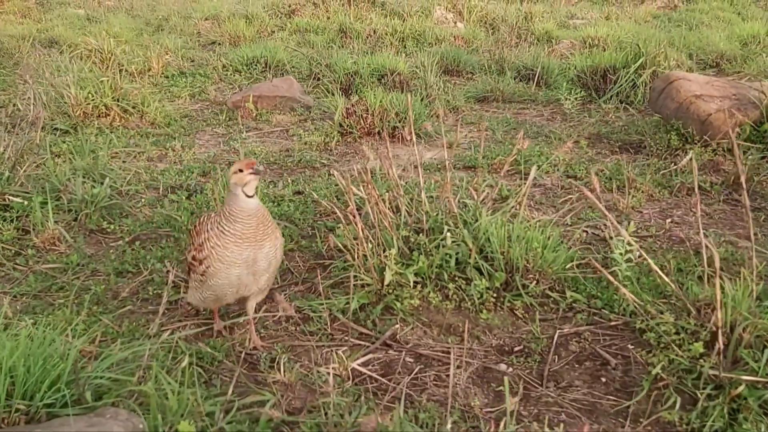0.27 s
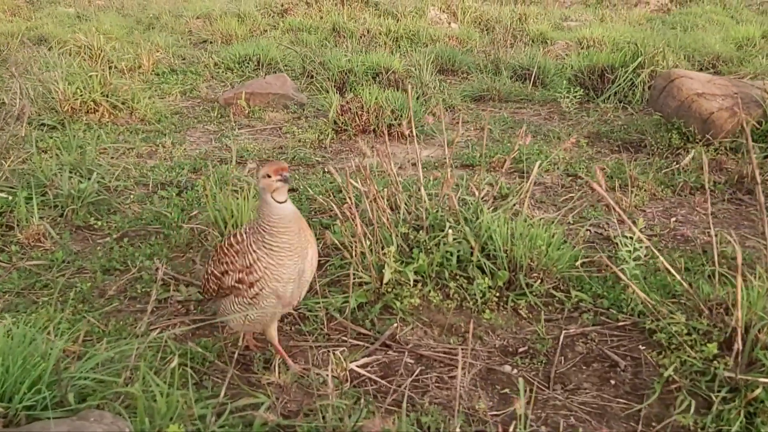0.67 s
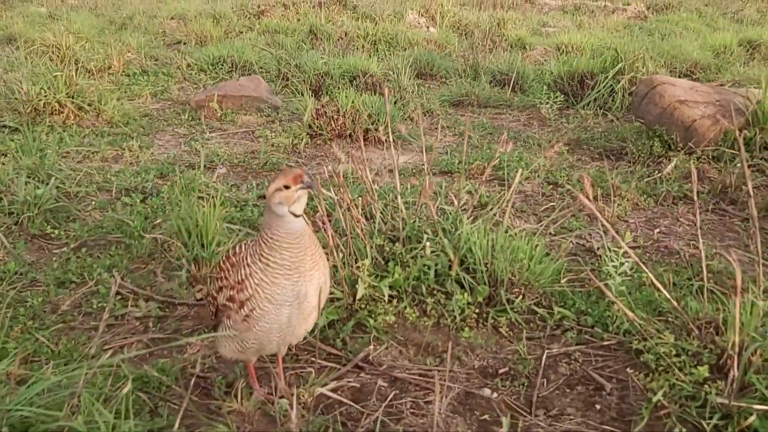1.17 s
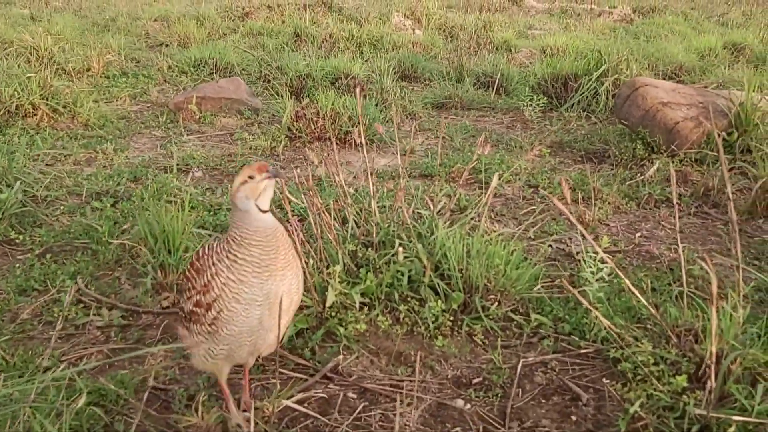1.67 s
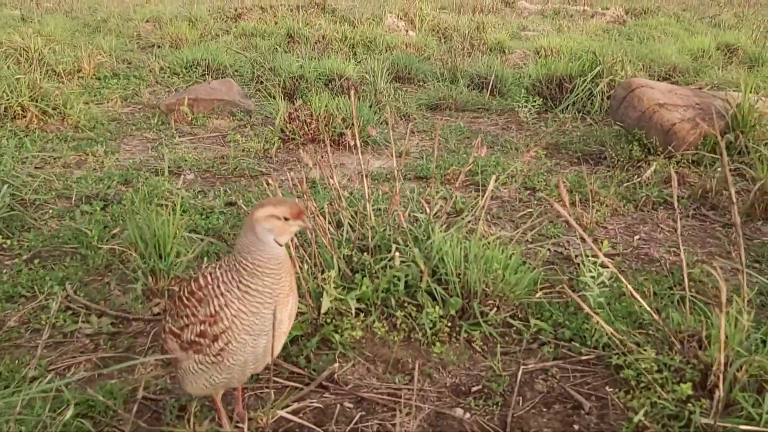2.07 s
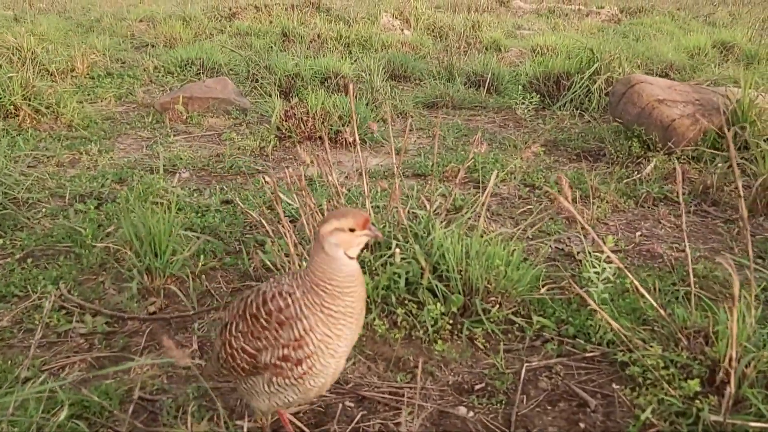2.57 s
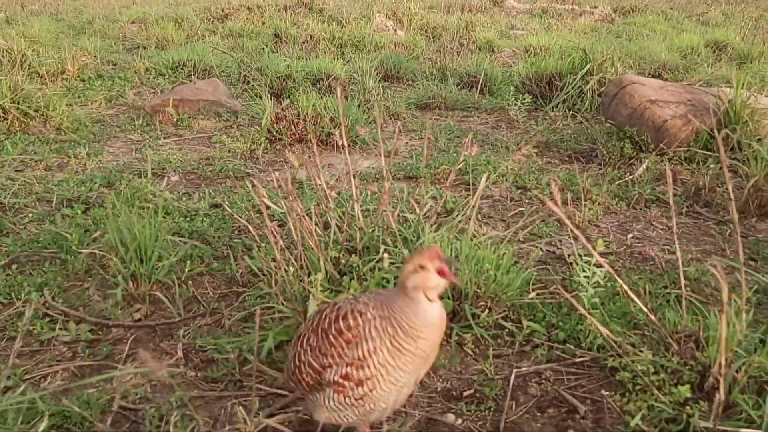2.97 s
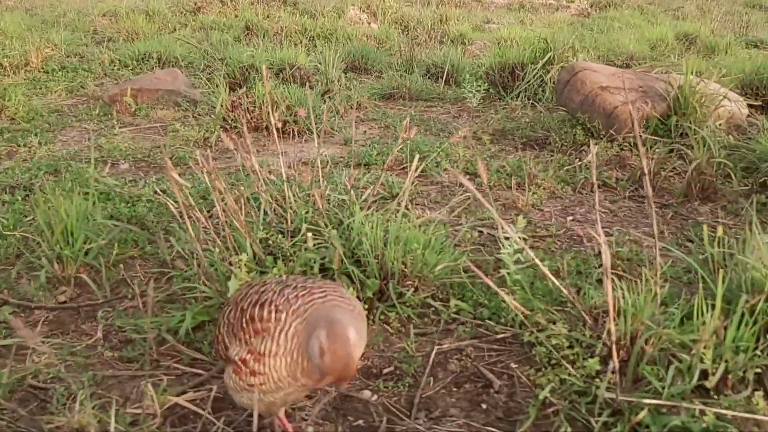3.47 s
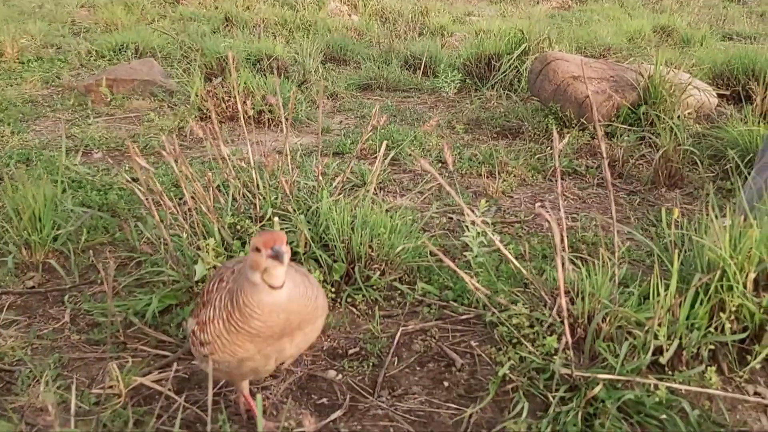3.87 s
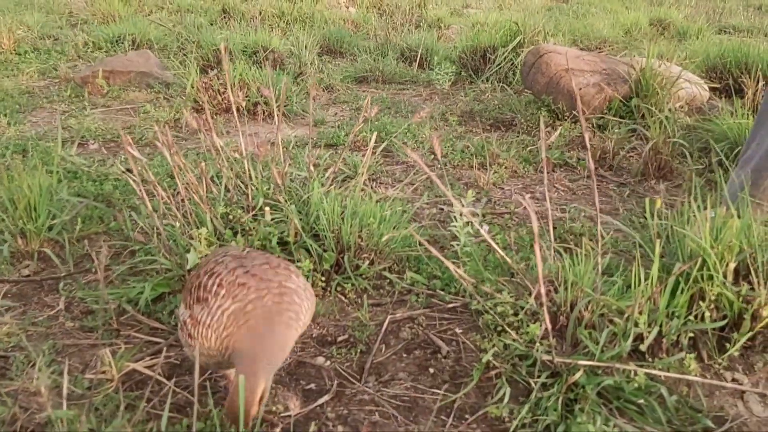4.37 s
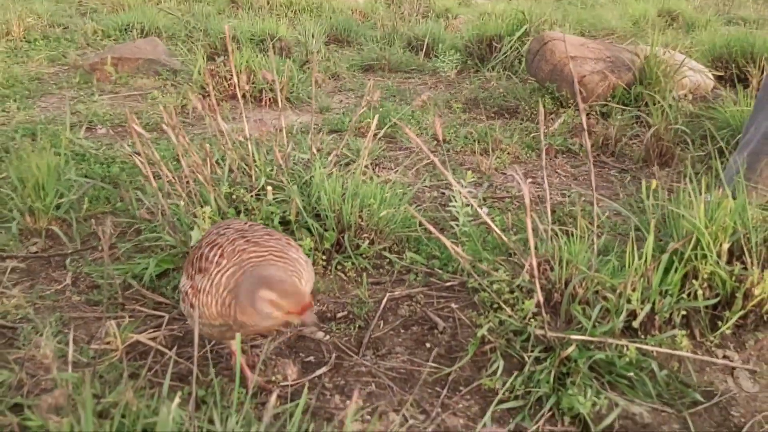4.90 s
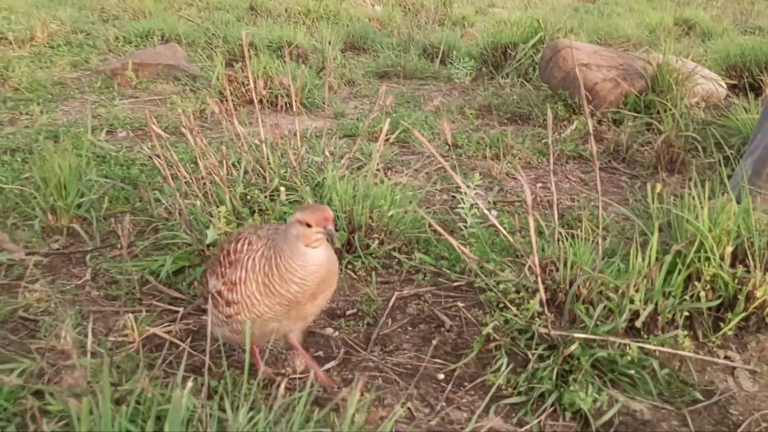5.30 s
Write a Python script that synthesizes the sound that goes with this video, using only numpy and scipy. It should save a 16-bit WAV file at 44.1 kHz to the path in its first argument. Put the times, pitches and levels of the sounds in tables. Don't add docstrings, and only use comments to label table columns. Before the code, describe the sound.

Two game birds duet loudly up close in open grassland: pure high whistles answered by raspy double notes and fading hoarse clucks over faint wind rumble.

```python
import sys
import numpy as np
from scipy import signal
from scipy.fft import rfft, irfft, next_fast_len
from scipy.io import wavfile
from scipy.ndimage import map_coordinates

SR = 44100
rng = np.random.default_rng(int(sys.argv[2]) if len(sys.argv) > 2 else 0)


def dump_mix(stems):
    frames = np.atleast_2d(stems).T
    limited = np.clip(frames, -1, 1)
    pcm = np.round(limited * 32767).astype(np.int16)
    wavfile.write(sys.argv[1], SR, pcm)


def gain_from_db(level_db):
    decades = np.asarray(level_db, float) / 20
    return 10 ** decades


N = 244302


def rms_one(x):
    return x / np.sqrt(np.mean(x ** 2) + 1e-20)


def colour(x, points):
    size = next_fast_len(N + 4096)
    hz, db = np.transpose(points)
    log_hz = np.log(np.arange(size // 2 + 1) * SR / size + 1)
    gain = gain_from_db(np.interp(log_hz, np.log(hz), db, left=db[0] - 23.5))
    return irfft(rfft(x, size) * gain, size)[..., :N]


def port_noise(shared):
    return rng.standard_normal((2, N)) + shared * rng.standard_normal(N)


def drift(rate_hz):
    lowpass = signal.butter(2, rate_hz, fs=SR, output="sos")
    return rms_one(signal.sosfilt(lowpass, rng.standard_normal(N + SR))[SR:])


def turns(hz):
    return 2 * np.pi * np.cumsum(hz) / SR


def clock(start, early, late):
    at = np.arange(round((start + early) * SR), min(round((start + late) * SR), N))
    return at, at / SR - start


def gate(t, on, off, attack, release):
    return -30 * np.maximum(np.maximum((on - t) / attack, (t - off) / release), 0)


def hill(t, top, rise, fall):
    return -np.maximum((top - t) * rise, (t - top) * fall)


PATCH_EDGES_HZ = [500, 1500, 2300, 3200, 4500, 6300, 9000, 16000]


def patchy(points, patch_db, rate_hz):
    noise = rms_one(colour(rng.standard_normal(N), points))
    total = np.zeros(N)
    for edges in zip(PATCH_EDGES_HZ, PATCH_EDGES_HZ[1:]):
        band = signal.butter(2, edges, "band", fs=SR, output="sos")
        total += signal.sosfilt(band, noise) * gain_from_db(patch_db * np.minimum(drift(rate_hz), .8))
    return rms_one(total)


# [pitch_hz, level_db]
AIR = [(500, 0), (2000, -2), (5000, -12), (8000, -24), (11000, -22), (15500, -15)]


def air():
    return gain_from_db(-75) * rms_one(colour(port_noise(0), AIR))


# [pitch_hz, level_db per Hz]
RUMBLE = [(15, -40), (30, -12.5), (65, 4), (100, 4.5), (135, -0.65), (176, -10.5), (227, -27.5),
          (299, -13.5), (344, -26), (400, -36.5), (520, -68.5), (880, -120)]
# [time_s, level_db]
BREEZE = [(0, -60.5), (.2, -61.5), (.28, -50.5), (.7, -52.5), (.95, -66), (2.2, -59.5), (2.6, -66.5),
          (3.6, -62.5), (4.05, -66), (5.54, -59.5)]
# [peak_s, level_db, width_s to a 12 dB drop, sign ignored]
GUSTS = [(0.508, -56.5, -0.36), (.63, -43, 0.02), (1.129, -55.5, 0.36), (1.292, -73, -0.55),
         (1.8, -64.5, 0.1), (4.171, -63.5, 0.52), (5.52, -58, -0.1)]


def wind():
    time = np.arange(N) / SR
    thumps = [(s + SECOND_S / 2, puff_db - 7, .035) for (s, *_), (*_, puff_db) in zip(ANSWERS, ANSWER_COLOUR)]
    push = gain_from_db(np.interp(time, *np.transpose(BREEZE)))
    for s, db, width in list(GUSTS) + thumps:
        push += gain_from_db(db - 12 * ((time - s) / width) ** 2)
    white = port_noise(.5)
    lumps = gain_from_db(3.5 * np.array([drift(5.4), drift(11)]))
    rumble = rms_one(colour(white, RUMBLE)) * push * lumps
    flutter = rms_one(colour(white, [(120, -8), (200, 0), (330, -6), (480, -15), (700, -40)]))
    return rumble * gain_from_db([[1.2], [-1.2]]) + flutter * gain_from_db(-69 + 3 * drift(14))


def fly():
    out, length = np.zeros((2, N)), .14
    at, t = clock(1.895, -.03, length + .03)
    hz = 262 * (1 + 0.036 * np.sin(np.pi * t / length))
    out[:, at] += gain_from_db(-57 + gate(t, 0, length, 0.033, 0.025)) * np.sin(turns(hz))
    return out


# [start_s, level_db, pitch_hz]
RUSTLES = [
    (5.156, -45.5, 1300),
    (5.191, -45.5, 1697),
    (5.212, -36, 900),
    (5.225, -33.5, 595),
    (5.286, -47.5, 1490),
]


def grass():
    out = np.zeros((2, N))
    fade = np.exp(-np.arange(600) / (0.0054 * SR))
    for s, db, hz in RUSTLES:
        band = signal.butter(1, [hz * 0.71, hz * 0.9], "band", fs=SR, output="sos")
        tick = signal.sosfilt(band, rng.standard_normal((2, 600)))
        out[:, round(s * SR):round(s * SR) + 600] += gain_from_db(db) * tick * fade
    return out


def breath_puffs():
    out = np.zeros((2, N))
    noise = port_noise(.5) + 2.5 * rng.standard_normal(N)
    blast = rms_one(colour(noise, [(40, -18), (90, 0), (200, -6), (450, -5.5), (800, -17.5)]))
    for (s, *_), (*_, puff_db) in zip(ANSWERS, ANSWER_COLOUR):
        at, t = clock(s, -.01, .11)
        puffs = sum(gain_from_db(hill(t, flip, 3000, 1395) + 8) for flip in (.003, FIRST_END_S, SECOND_S))
        breath = gain_from_db(-8.5 + gate(t, 0, .07, .01, 0.23))
        out[:, at] += gain_from_db(puff_db) * (puffs + breath) * blast[:, at]
    return out


# [left_s, right_s, level_db]
ECHOES = [
    (.011, .013, -26),
    (.022, .019, -33),
    (.034, .038, -44),
    (.050, .056, -55),
    (.078, .076, -45),
    (.098, .105, -58),
]
# [pitch_hz, level_db]
GROUND = [(300, -3), (2250, 2), (2650, -9), (3600, -6), (8000, -17), (16000, -40)]


def echoes(thrown):
    out, dull = np.zeros((2, N)), colour(thrown.mean(axis=0), GROUND)
    for *lags, db in ECHOES:
        for side, lag in enumerate(lags):
            smear = rms_one(rng.standard_normal(440) * np.hanning(440)) / np.sqrt(440)
            start = round(lag * SR)
            out[side, start:] += gain_from_db(db) * signal.oaconvolve(dull, smear)[:N - start]
    return out


# [time_s, right-port delay_samples]
BEARING = [(0, 6.75), (2.102, 6.4), (2.301, 5.1), (2.8, 6), (3.001, 0.99), (3.202, 2.3), (3.297, 4.6),
           (3.8, 7.8), (4.3, 5.2)]
# [pitch_hz, left-right level_db]
HEAD_SHADOW = [(20, -1.5), (500, 0.5), (1200, -6), (1800, -5.5), (2600, -7), (4000, -7), (6500, 2),
               (8000, -8), (12000, -8.5)]


def two_ports(x):
    lag = np.interp(np.arange(N) / SR, *np.transpose(BEARING))
    late = map_coordinates(x, [np.arange(N) - lag], order=3)
    left = colour(x, [(hz, db / 2) for hz, db in HEAD_SHADOW])
    right = colour(late, [(hz, -db / 2) for hz, db in HEAD_SHADOW])
    return np.array([left, right])


# [start_s, length_s, level_db, pitch_factor,
# chaos_db]
FIRST = [(.400, 0.075, -18.5, 1.023, -0.5), (1.084, 0.077, -19.5, 1.023, -0.5),
         (1.836, 0.076, -22.5, 1.045, 1.3), (2.555, .078, -19, 1.0, -6), (3.275, .077, -20.5, 1.08, -2.5),
         (4.067, 0.069, -25, 1.01, -1.5)]
SECOND = [(.538, 0.067, -22.5, 1.01, 0), (1.228, 0.067, -24, 1.1, 1), (1.972, 0.068, -25.5, 1.01, 1.6),
          (2.693, 0.061, -25, 1.1, -3)]
THIRD = [(.672, .054, -36.5, 1.01, 4), (1.368, .055, -36.5, 1.01, -11), (2.113, .054, -38.5, 1.3, -24),
         (2.826, .06, -43.5, 1.38, -9.5), (3.41, .08, -44, 1.15, 1.2), (3.562, .045, -55, 1.2, -11),
         (4.194, .075, -40.5, 1.25, -1)]
# [rest_hz, climax_hz, climax_share of length, mumble_db before, fall_db per length]
PULSES = [(404, 590, .5, -17.5, 28), (375, 430, .48, -12, 26), (295, 450, 0.46, -8, 16)]
# [start_hz, wide_hz, shut_hz, then shares of length: wide, starts to close, shut]
BEAK = [(2300, 2760, 2020, .25, .54, .62), (1600, 1950, 1800, .4, .5, .6), (1450, 1500, 1350, .3, .5, .8)]
# [peak_share of length, level_db, rise_db and fall_db per length, half_line_db]
SWEEP = [(.72, 5.5, 43, 33, -12.5), (0.7486, 2, 70, 27, -19), (.4, -3.5, 15, 12, -13.5)]
# [level_db, rise_db and fall_db per length]
TURBULENCE = [(4.5, 64, 67), (-12, 42, 27), (-11.5, 13, 40)]
VOICE_DB = [-2, 2.8, 2.94]
# [pitch_hz, level_db]
THROAT = [(600, -15.5), (800, -25.5), (1100, -9.5), (1450, -0.5), (1800, 0), (2150, -21), (2600, -15.5),
          (3400, -29), (6000, -29)]
# [pitch_hz, level_db per Hz]
CHAOS = [(600, -38), (1200, -15.5), (1900, -11.5), (2700, 7.5), (3600, -4), (4900, -10), (5900, -5),
         (7500, -22), (9500, -24), (15000, -34.5)]


def clucks():
    out, jitter = np.zeros(N), drift(150)
    flicker = np.minimum(drift(61), 1)
    chaos = patchy(CHAOS, patch_db=3.5, rate_hz=50) * gain_from_db(2.5 * np.minimum(drift(190), 1))
    throat_hz, throat_db = np.transpose(THROAT)
    kinds = (FIRST, 4.5, -22), (SECOND, 4.0, -21), (THIRD, 1.8, -7)
    for kind, (events, rough, chest_db) in enumerate(kinds):
        rest_hz, top_hz, climax, mumble_db, fall = PULSES[kind]
        start_hz, wide_hz, shut_hz, *moves = BEAK[kind]
        sweep_at, sweep_db, *sweep_slopes, half_db = SWEEP[kind]
        noise_db, *noise_slopes = TURBULENCE[kind]
        for s, length, db, factor, chaos_db in events:
            at, t = clock(s, 0, length * 1.05)
            u = t / length
            sounding = gain_from_db(db + gate(u, .02, .86, .02, .196))

            mumble = mumble_db + 3.5 * np.exp(-u / 0.19)
            rise = np.maximum(hill(u, climax, 150, 0), mumble)
            voice = VOICE_DB[kind] + np.where(u < climax, rise, -fall * (u - climax))
            arch = np.exp(-((u - climax) / 0.19) ** 2)
            hz = (rest_hz + (top_hz - rest_hz) * arch) * factor * (1 + 0.014 * rough * jitter[at])
            phase = turns(hz)
            stack = gain_from_db(chest_db - 3 + 5 * flicker[at]) * (np.sin(phase) + .5 * np.sin(1.5 * phase))
            for k in range(2, 11):
                partial_db = np.interp(k * hz, throat_hz, throat_db) + rough * flicker[at - 9001 * k]
                stack += gain_from_db(partial_db) * np.sin(k * phase + 1.2 * k * k)

            beak_hz = np.interp(u, [0, *moves, 1], [start_hz, wide_hz, wide_hz, shut_hz, 0.75 * shut_hz])
            swept = turns(beak_hz * factor * (1 + 0.011 * rough * jitter[at - 7001]))
            half_level = half_db + rough * flicker[at - 6001] + hill(u, climax + 0.037, 30, 90)
            sweep = gain_from_db(1.2 * rough * flicker[at - 4001]) * np.sin(swept) + gain_from_db(half_level) * np.sin(swept / 2)
            sweep *= gain_from_db(sweep_db + hill(u, sweep_at, *sweep_slopes))

            pulsing = 1 + 0.38 * np.cos(phase)
            noise_level = noise_db + chaos_db + np.minimum(hill(u, climax, *noise_slopes), -4)
            turbulence = gain_from_db(noise_level) * pulsing * chaos[at]
            out[at] += sounding * (gain_from_db(voice) * stack + sweep + turbulence)
    return out


FIRST_END_S, SECOND_S, SECOND_END_S, FLIP_S = .025, .047, .096, .003
# [pitch_hz, level_db per Hz]
RASP_BRIGHT = [(700, -40.5), (1300, -12), (2600, -1.5), (3800, 3), (4900, -9.5), (6200, -7.5),
               (9000, -17.5), (15000, -24)]
# [pitch_hz, level_db per Hz]
RASP_DARK = [(600, -32), (1200, -7), (2000, 13), (2700, 1.5), (4000, -17.5), (6500, -14), (15000, -36.5)]


def rasp():
    out, jitter = np.zeros(N), drift(300)
    bright, dark = (patchy(points, patch_db=6.5, rate_hz=70) * gain_from_db(np.minimum(drift(170), 1))
                    for points in (RASP_BRIGHT, RASP_DARK))
    for (s, *_, rasp_db), (*_, low_db, _) in zip(ANSWERS, ANSWER_COLOUR):
        at, t = clock(s, -.055, .13)
        late = t > FIRST_END_S / 2
        on, off = np.where(late, FIRST_END_S, -.042), np.where(late, SECOND_S, 0)
        place = np.clip(2 * (t - on) / (off - on) - 1, -1, 1)
        rasping = gate(t, on, off, np.where(late, FLIP_S, .008), FLIP_S * 4.1)

        phase = turns((1199 + 334 * place ** 4 + 50 * place) * (1 + 0.022 * jitter[at]))
        low = sum(a * np.sin(k * phase) for k, a in enumerate((1, 0.21, .7, 0.72, 0.28), 1))
        low_level = rasp_db + low_db + 2 + rasping - 10 * (1 - place) / 2
        out[at] += np.sqrt(2) * gain_from_db(low_level) * low

        chaos = gain_from_db(rasping - (3 + 6 * late) * (1 - place ** 4) + 4.5 - 2.7 * late)
        chaos += gain_from_db(-14.5 + gate(t, 0, SECOND_END_S, FLIP_S, .012))
        croak = gain_from_db(1.5 + hill(t, .098, 30 / 0.014, 1200.5))
        pulsing = 1 + 0.41 * np.cos(phase / 2)
        noise = chaos * pulsing * (.85 * bright[at] + .15 * dark[at]) + croak * dark[at]
        out[at] += gain_from_db(rasp_db + 1.5) * noise
    return out


# [first_note_s, first_note_hz, second_note_hz, level_db, rasp_db]
ANSWERS = [
    (0.196, 2586, 2567, -12, -21.5),
    (.873, 2608, 2571, -8, -24),
    (1.622, 2583, 2600, -9, -24.5),
    (2.342, 2634, 2590, -8, -24),
    (3.063, 2605, 2619, -10.5, -23),
    (3.861, 2688, 2569, -14.5, -22),
]
# [second_note_db, octave_db, higher_partials_db, low_register_db, puff_db at the ports]
ANSWER_COLOUR = [(-0.55, -2.5, 4, -8.5, -65), (-2, -12.5, -2, -5.5, -52), (-2, -9.5, -7.5, -5, -63),
                 (-4, -8, -2, -7.5, -50.5), (-5, -11.5, 4.5, -12.5, -44), (-2.5, -5.5, 11, -17.5, -38.5)]
OVERTONES_DB = [-20.5, -25, -23, -28]


def clear_notes():
    out, jitter = np.zeros(N), drift(300)
    for (s, hz1, hz2, db, _), (second_db, octave_db, bright_db, *_) in zip(ANSWERS, ANSWER_COLOUR):
        at, t = clock(s, -.055, .13)
        second = t > (FIRST_END_S + SECOND_S) / 2
        clear = np.where(second, gate(t, SECOND_S, SECOND_END_S, FLIP_S, FLIP_S),
                         gate(t, 0, FIRST_END_S, FLIP_S, FLIP_S))
        drop_at, knee = 0.072, 0.0025
        drop = 7.5 * knee * np.logaddexp(0, (t - drop_at) / knee)
        bend = 1 - np.where(second, drop, .6 * (t - .012))
        phase = turns(np.where(second, hz2, hz1) * bend * (1 + 0.0025 * jitter[at]))

        swing = np.where(second, hill(t, 0.08, 146.5, 1150.5) + 4.5, hill(t, 0.014, 80, 501.5))
        over_db = clear - 852 * np.maximum(t - drop_at, 0)
        note = gain_from_db(clear + swing) * np.sin(phase)
        for k, partial_db in enumerate([octave_db, *np.add(OVERTONES_DB, bright_db)], 2):
            waver_db = k * np.minimum(jitter[at - 5003 * k], .5) / 2
            note += gain_from_db(partial_db + k * over_db / 2 + waver_db) * np.sin(k * phase)
        out[at] += np.sqrt(2) * gain_from_db(db + second_db * second) * note
    return out


# [start_s, length_s, pitch_hz, level_db, fade_out_s]
WHISTLES = [
    (0.04, 0.24, 2694, -16.5, 0.14),
    (0.704, 0.21, 2656, -9.5, 0.099),
    (1.479, 0.25, 2666, -12, 0.17),
    (2.193, 0.19, 2659, -14, 0.07),
    (2.915, 0.2312, 2659, -13.5, 0.1),
    (3.634, .199, 2648, -13.5, 0.02),
    (4.448, 0.21, 2664, -13.5, 0.018),
    (5.495, 0.12, 2644, -16.5, 0.033),
]
# [left-right level_db, left_lead_rad, second_db, third_db, breath_db]
WHISTLE_POSE = [(4.5, 1.52, -19, -8, -20), (-10, -1.1, -27, -15, -28.5), (-16.5, -6.5, -22.5, -16.5, -28),
                (-15, 0.65, -24, -14, -29.5), (-14, 1.07, -24, -15, -30), (-10, 0.5, -35.5, -20.5, -28),
                (-8.5, -.51, -37, -20.5, -25.5), (8.5, -1.7, -29, -11.5, -22.5)]
# [pitch_hz, level_db per Hz]
WHISTLE_BREATH = [(450, -14.5), (560, -13), (800, -25), (1800, -22.5), (2600, -1.5), (3600, -14.5),
                  (4100, -13.5), (4600, -36.5), (5300, -15.5), (6100, -39), (7000, -14), (8000, -3.5),
                  (9000, -15.5), (15000, -18.5)]


def whistler():
    out, tremor, hoarse, waver = np.zeros((2, N)), drift(40), drift(500), drift(16)
    breath = rms_one(colour(port_noise(0.58), WHISTLE_BREATH))
    for (s, length, hz, db, fade_s), pose in zip(WHISTLES, WHISTLE_POSE):
        pan_db, lead, second_db, third_db, breath_db = pose
        at, t = clock(s, -.03, length + .025)
        scoop = .016 * np.exp(-np.maximum(t, -.012) / .012)
        pitch = hz * (1 - scoop) - 79 * t
        phase = turns(pitch * (1 + 0.0022 * tremor[at]))

        kick = 3.2 * np.exp(-np.abs(t) / .007)
        swell = 6.5 * np.exp(-np.maximum(t, 0) / 0.017)
        fade = 9.5 * np.clip(1 + (t - length) / fade_s, 0, 1)
        level = db + kick - swell - fade + gate(t, -.004, length, 0.0076, 0.0077)
        level += 0.18 * tremor[at] + .4 * waver[at]

        share = np.sqrt(2 / (1 + gain_from_db(2 * pan_db * np.array([[-1], [1]]))))
        tone = share * np.sin(phase + [[lead], [0]])
        overtones_db = second_db, third_db, -40, third_db - 26
        for k, over_db, rough in zip(range(2, 6), overtones_db, (0.18, 0.3, .6, .7)):
            port_gain = gain_from_db(over_db + np.array([[-6.], [2.]]))
            over_lead = 2.4 if k == 2 else -1.4
            tone += port_gain * (1 + rough * hoarse[at]) * np.sin(k * phase + [[over_lead], [0]])
        out[:, at] += np.sqrt(2) * gain_from_db(level) * tone
        breathing = gain_from_db(gate(t, 0.00048, length, 0.043, 0.0078) + db + breath_db)
        out[:, at] += breathing * breath[:, at] * gain_from_db([[-4], [2]])
    return out


def scene():
    background = air() + wind() + fly() + grass() + breath_puffs()
    answering = two_ports(clucks() + rasp() + clear_notes())
    whistling = whistler()
    thrown = gain_from_db(-8) * whistling + answering
    return background + echoes(thrown) + answering + whistling


def top_cut(x):
    return signal.sosfilt(signal.butter(12, 16920, fs=SR, output="sos"), x)


def record(dry):
    limited = dry / (1 + np.abs(dry) ** 6) ** (1 / 6)
    steep = signal.cheby2(14, 60, 16700, fs=SR, output="sos")
    return top_cut(1.007 * signal.sosfilt(steep, limited))


dry = scene()
out = record(dry)
dump_mix(out)
```